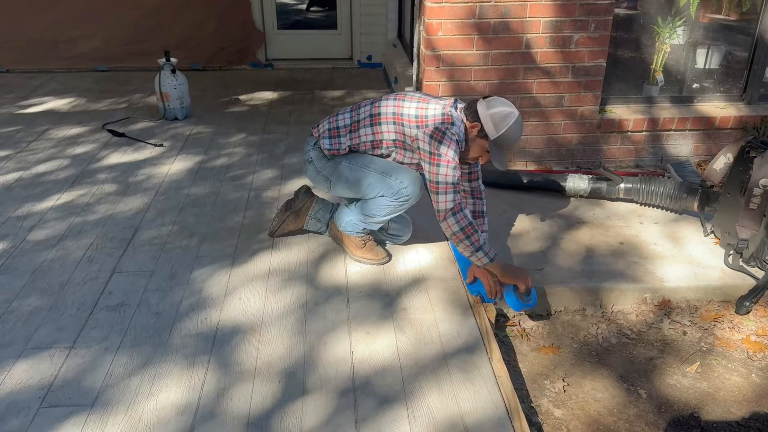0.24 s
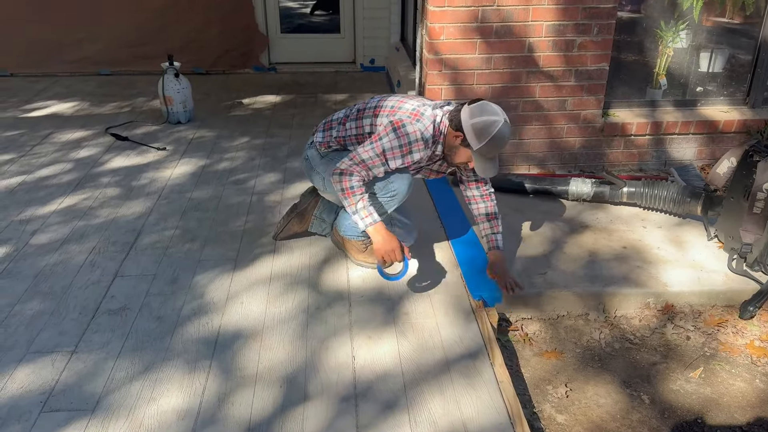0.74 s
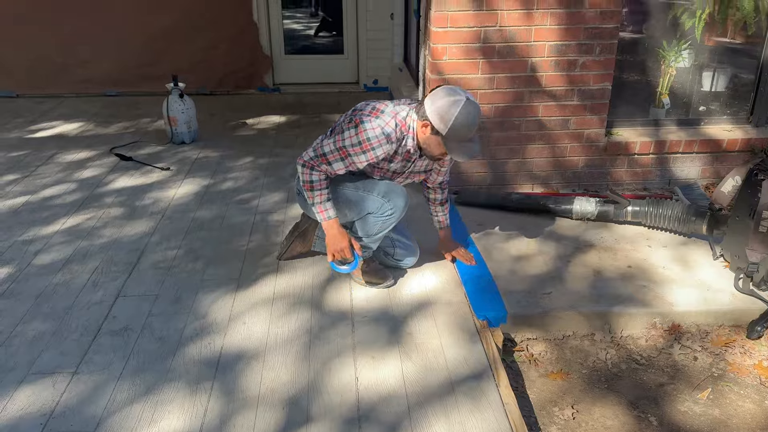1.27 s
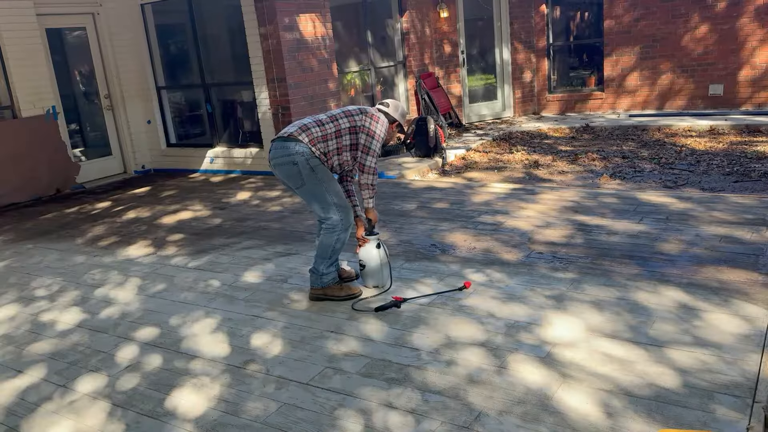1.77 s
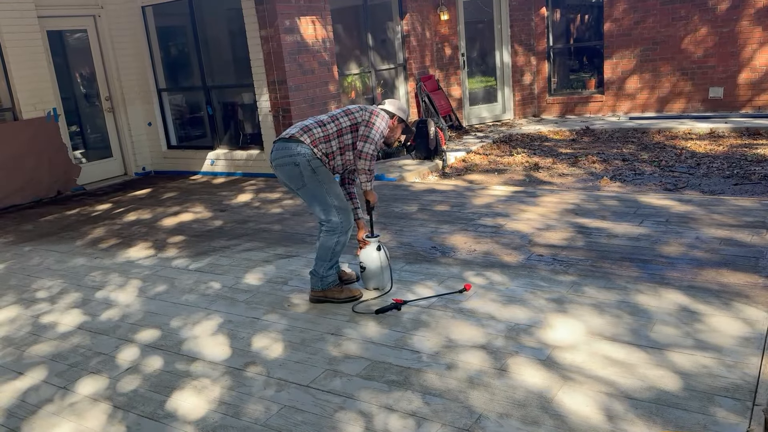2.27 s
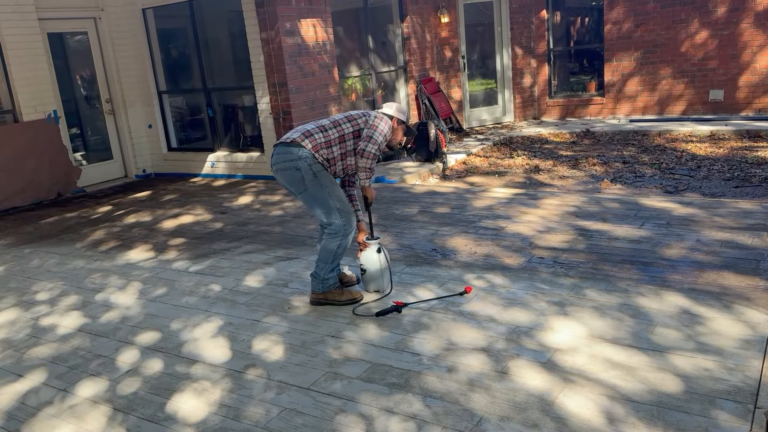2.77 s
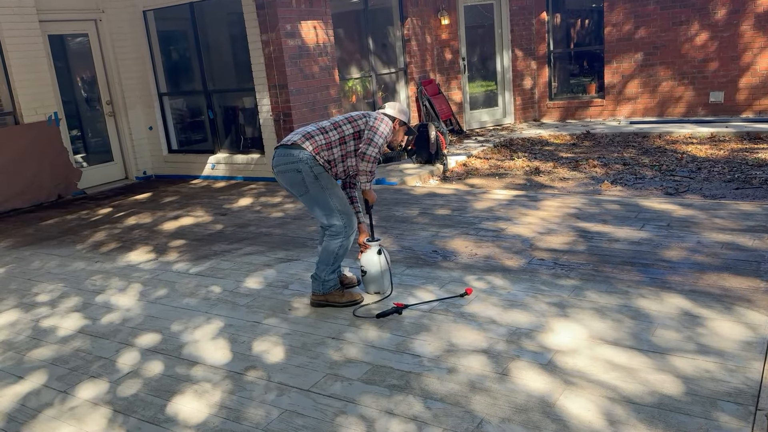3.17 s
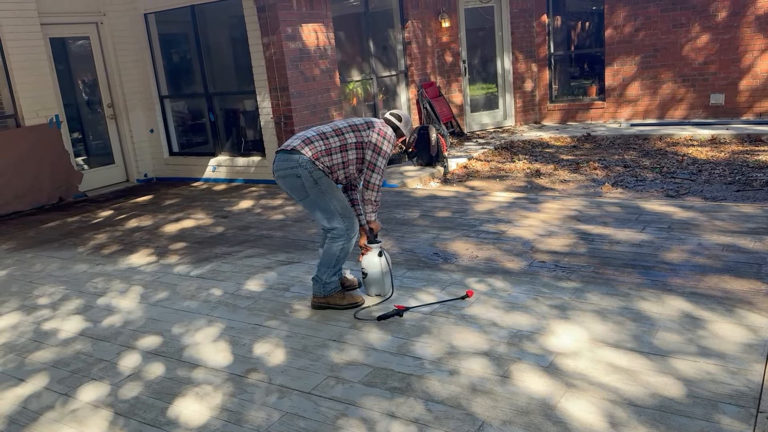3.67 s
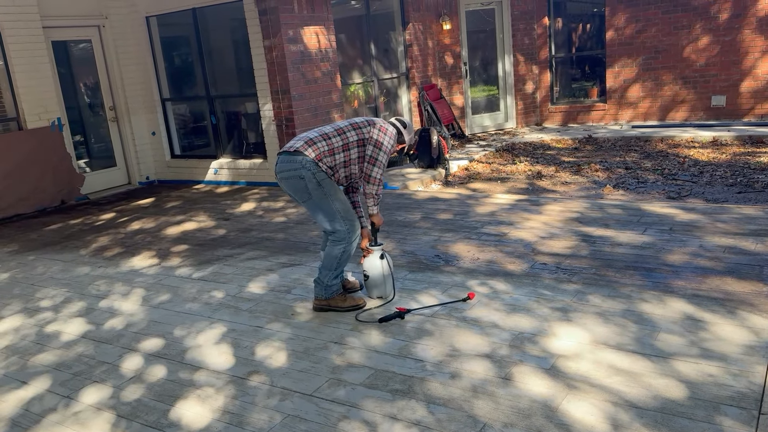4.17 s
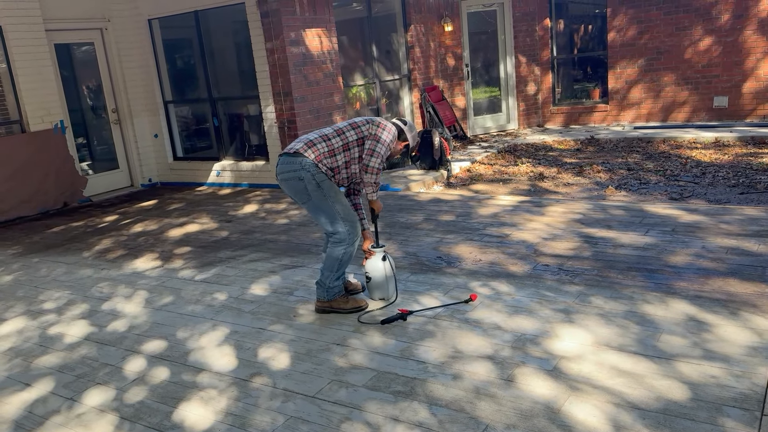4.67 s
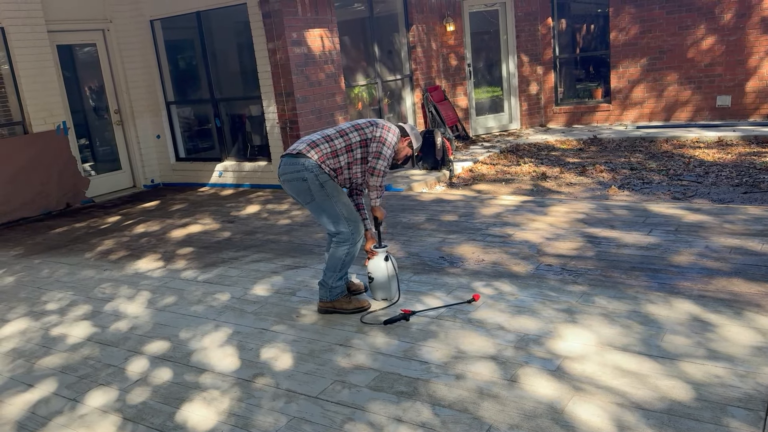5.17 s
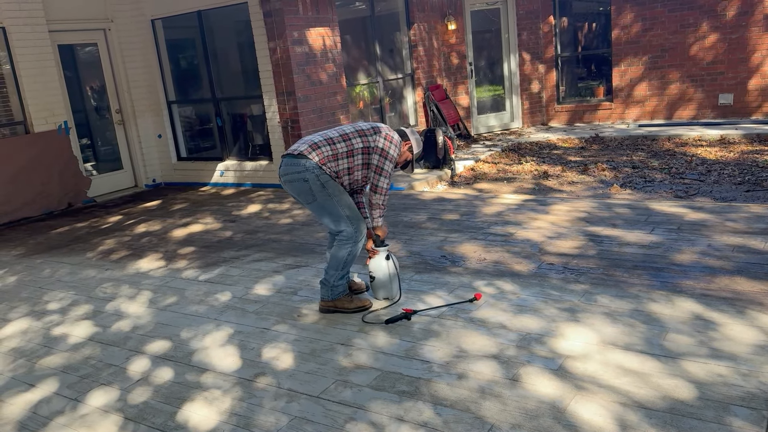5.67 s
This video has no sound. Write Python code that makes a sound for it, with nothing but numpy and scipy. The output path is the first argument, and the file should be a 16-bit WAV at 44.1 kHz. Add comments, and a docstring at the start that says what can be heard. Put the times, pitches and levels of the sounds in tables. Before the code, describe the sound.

Very quiet masking tape peels off its roll in two short crackling strips over faint rumble. A hard cut brings a much louder sprayer pump: about two and a half strokes a second, rubber squeaks and lower groans on pushes, airy hisses and small chirps on pulls, plastic clacks throughout. Close stereo outdoor perspective, short dull wall echoes, distant rumble growing. It ends in a falling squeal and a clack.

```python
"""Outdoors on a patio, in a wide stereo picture: masking tape is peeled quietly off its roll in two strips.
Then, abruptly, a garden sprayer is pumped, 2.5 strokes a second, over slowly growing distant outdoor noise.
On each push the piston seal rubs and squeaks on the plastic tank's resonances, and the handle clacks;
on each pull air hisses into the barrel and, mostly, the seal chirps higher. A house wall repeats squeaks
and clacks a moment later. The last push ends in a falling squeal; one more clack follows."""
import sys
import numpy as np
from scipy import signal
from scipy.fft import rfft, irfft, next_fast_len
from scipy.io import wavfile
from scipy.ndimage import map_coordinates

SR = 44100
rng = np.random.default_rng(int(sys.argv[2]) if len(sys.argv) > 2 else 0)


def log_audio(samples):
    """Write samples as a 16-bit WAV file to the path given in sys.argv[1]."""
    # one column per channel
    frames = np.atleast_2d(samples).T
    # limit to full scale, then quantise
    limited = np.clip(frames, -1, 1)
    pcm = np.round(limited * 32767).astype(np.int16)
    wavfile.write(sys.argv[1], SR, pcm)


N = 261245
TIME = np.arange(N) / SR
PUMP_START = 1.508  # the tape gives way to the sprayer (s)

# Pushes: the seal squeaks as it starts to move, then groans lower as it takes the load
# [squeak t/s, squeak level/dB, groan delay/s, groan level/dB], before the rubber gain
PUSHES = [(1.668, -35.5, .04, -33.5), (2.104, -24, .049, -29), (2.505, -26, 0.049, -25.5),
          (2.897, -26.5, .047, -20), (3.295, -24, 0.04, -22.5), (3.688, -28, .046, -20),
          (4.081, -24.5, .038, -23.5), (4.478, -26.5, 0.049, -18.5), (4.878, -27, .037, -16.5),
          (5.269, -25.5, .032, -20)]
# Last push: the squeak slides down into the groan [t/s, f/Hz, level/dB], before the rubber gain
SQUEAL = [(5.641, 851, -32), (5.653, 754, -17.5), (5.664, 690, -14.5), (5.677, 617, -23.5),
          (5.689, 463, -20), (5.717, 455.3, -19), (5.741, 430, -40)]
# Pulls: air is drawn into the barrel [t/s, hiss level/dB], before each layer's gain
PULLS = [(1.815, -45), (2.236, -42), (2.631, -39), (3.023, -39.5), (3.424, -41.5), (3.824, -40),
         (4.209, -42), (4.607, -38.5), (4.996, -41), (5.377, -42.5)]
# Colour of the seal's rubbing [f/Hz, density/dB per Hz]
RUB = [(60, -23), (150, 12.5), (330, 8.5), (580, 1), (850, -4), (1100, -5), (1550, 1), (2200, 1.5),
       (3000, -26), (4200, -11), (9000, -22)]
# Colour of what the house and patio send back [f/Hz, level/dB]
ECHO_COLOUR = [(150, -11), (330, -8), (450, -7), (800, -8), (1200, -16), (2500, -23), (10000, -32)]


def amp(db):
    """Decibels to amplitude."""
    return 10 ** (np.asarray(db) / 20)


def unit(x):
    """Scale to rms 1."""
    return x / np.sqrt(np.mean(x ** 2) + 1e-20)


def along(points, hz):
    """Read (Hz, value) points on a log frequency axis."""
    f, v = np.transpose(points)
    return np.interp(np.log(hz + 1), np.log(f), v)


def wobble(rate, size=N):
    """A smooth random curve, rate knots a second."""
    knots = rng.standard_normal(size // 8)
    return map_coordinates(knots, [np.arange(size) * rate / SR], mode="wrap")


def add(track, s, sound):
    """Mix a sound into a track from time s."""
    part = track[max(round(s * SR), 0):][:len(sound)]
    part += sound[:len(part)]


def filtered(x, response):
    """Filter x by a complex response of frequency."""
    size = x.shape[-1]
    m = next_fast_len(size + SR // 4)
    return irfft(rfft(x, m) * response(np.fft.rfftfreq(m, 1 / SR)), m)[..., :size]


def rush(spectrum, likeness=None):
    """Stereo noise of rms 1 with a given colour and left-right likeness."""
    if likeness is None:
        # How alike left and right are for the sprayer and yard [f/Hz, left-right correlation]
        likeness = [(60, 0.94), (290, 0.91), (640, 0.29), (2200, 0.67), (5200, 0.34), (7400, 0.36),
                    (9000, 1), (15000, 0.97)]

    def mid_side(hz):
        turn = np.arccos(np.clip(along(likeness, hz), -1, 1)) / 2
        return amp(along(spectrum, hz)) * [np.cos(turn), np.sin(turn)]

    mid, side = filtered(rng.standard_normal((2, N)), mid_side)
    return unit(np.array([mid + side, mid - side]))


def swell(start, rise, hold, fall):
    """A gate that opens, holds and closes along the clock."""
    corners = np.cumsum([0, abs(rise), abs(hold), abs(fall)])
    return np.interp(TIME - start, corners, [0, 1, 1, 0])


def pushes():
    """Start and rubbing level of every push, the squealing one included; rubbing grows with the pressure."""
    lead_s = 0.035  # rubbing starts this long before the squeak
    start_db, grows_db_per_s = -35, 0.85  # before each layer's gain
    squeak_times = [row[0] for row in PUSHES] + [SQUEAL[1][0]]
    return [(s - lead_s, start_db + grows_db_per_s * (s - PUMP_START)) for s in squeak_times]


def each(strokes, delay, rise, hold, fall):
    """The same swell on every stroke, at that stroke's level."""
    return sum(amp(db) * swell(s + delay, rise, hold, fall) for s, db in strokes)


def seal(pitch, bright_db, jitter=0.021, shimmer_db=1.74, rasp=0.25, overtone_db=-2.1):
    """The seal sticks and slips; uneven slips smear the overtones more than the fundamental."""
    # How the tank radiates the overtones [f/Hz, level/dB]
    radiation = [(900, 4), (1500, 14), (2200, 6), (2900, -12.5), (3800, 1.5), (6000, -37), (12000, -38)]
    size, k = len(pitch), np.arange(2, 9)[:, None]  # k: harmonic number
    phase = 2 * np.pi * np.cumsum(pitch * (1 + jitter * wobble(356.5, size))) / SR
    slips = phase + rasp * wobble(600.5, size)
    weight = amp(along(radiation, k * pitch)) / np.sqrt(k)
    upper = np.sum(weight * np.cos(k * slips), axis=0) / np.linalg.norm(weight, axis=0)
    tone = np.cos(phase) + amp(bright_db + overtone_db) * upper
    return -np.sqrt(2) * amp(shimmer_db * wobble(297.4, size)) * tone


def slip(s, db, length, hz, glide, bright_db):
    """One short gliding burst of the seal, centred on time s; length is its width at half amplitude."""
    pitch_scatter, glide_scatter = 0.0252, 2.5  # from slip to slip: octaves, octaves per s
    out, t = np.zeros(N), np.arange(-SR // 16, SR // 16) / SR
    bend, detune = rng.standard_normal(2)
    pitch = hz * 2 ** (pitch_scatter * detune + (glide + glide_scatter * bend) * t)
    envelope = 2 ** -(2 * t / length) ** 2
    add(out, s + t[0], amp(db) * envelope * seal(pitch, bright_db))
    return out


def squeaks():
    """Stick-slip bursts: a squeak and a groan on each push, a rising chirp on most pulls."""
    # Upward chirps of the seal on pulls [t/s, level/dB, length/s, f/Hz], before the rubber gain
    chirps = [(2.253, -28.5, 0.011, 1140), (2.641, -31, .014, 1049), (2.673, -26.5, 0.0056, 1205),
              (3.036, -29.5, 0.012, 1078), (3.439, -34, 0.008, 1125), (3.838, -29, 0.0096, 1110),
              (4.62, -24.5, .006, 1067), (5.012, -28, .007, 1102), (5.391, -27.5, 0.013, 1165)]
    squeak_hz, sag_hz_per_s = 825, 17  # the squeak drops as the tank fills
    out = np.zeros(N)
    for s, db, after, groan_db in PUSHES:
        hz = squeak_hz - sag_hz_per_s * (s - PUMP_START)
        # glides in octaves per s, lengths in s
        out += slip(s, db, length=0.015, hz=hz, glide=-5, bright_db=-7)
        out += slip(s + after, groan_db, length=0.019, hz=451.5, glide=-1.993, bright_db=-6.5)
    for s, db, length, hz in chirps:
        out += slip(s, db, length, hz, glide=5, bright_db=-18)
    return out


def squeal():
    """Against full pressure the seal sticks and slips on in one falling tone."""
    s, hz, db = np.transpose(SQUEAL)
    out, t = np.zeros(N), np.arange(s[0], s[-1], 1 / SR)
    add(out, s[0], amp(np.interp(t, s, db)) * seal(np.interp(t, s, hz), bright_db=-5))
    return out


def whistle(start_hz, rise, jitter, level_db):
    """As the rod comes up, the seal whistles faintly and unsteadily, rising in pitch (octaves per s)."""
    out = np.zeros(N)
    for up, hiss_db in PULLS:
        pitch = start_hz * 2 ** (rise * np.clip(TIME - up, 0, .2)) * (1 + jitter * wobble(320))
        gate = swell(up - .01, 0.015, 0.045, 0.035)
        out += amp(hiss_db + level_db) * gate * np.sin(2 * np.pi * np.cumsum(pitch) / SR)
    return out * amp(2.4 * wobble(57))


def creaks(level_db, low_hz, span, life, count=5):
    """Through the rest of each pull the seal catches at random in tiny creaks that tend to rise."""
    out, t = np.zeros(N), np.arange(SR // 20) / SR
    for up, hiss_db in PULLS:
        for late, size, detune in rng.random((count, 3)):
            phase = 2 * np.pi * low_hz * 2 ** (0.35 * late + 0.28 * detune) * t
            ring = np.sin(phase) + 1.6 * np.sin(0.312 * phase) + 0.57 * np.sin(3 * phase)
            envelope = t / life * np.exp(1 - t / life)  # peaks after life seconds
            add(out, up + .03 + span * late, amp(hiss_db + level_db + 5.2 * size) * envelope * ring)
    return out


def clacks(thud_hz, thud_t60, thud_delay, thud_sweep, crack_t60, colour_width):
    """A crack, the short ring of stiff plastic, and a moment later the tank's soft falling thud."""
    # The handle against its stops [t/s, level/dB, thud relative level/dB]
    blows = [(1.664, -22, 8.5), (1.7197, 1, 2), (1.9742, -13, -6), (2.2033, -18, 7), (2.4806, -20, -1),
             (2.6147, -18.5, 11), (2.851, -22, 4), (2.9957, -16, 9.5), (3.1048, -21, 9), (3.4099, -19, 10),
             (3.7965, -14, 9), (4.1805, -23.5, 16.5), (4.3419, -18, 2), (4.8167, -20.5, -9),
             (4.967, -21, 8), (5.0091, -25, -10), (5.3503, -15, 6.5), (5.5132, -16, 0), (5.7272, -14, 12.5)]
    # Ringing modes of the pump's plastic, before scatter [f/Hz, relative level/dB, t60/s]
    plastic = [(640, -6.5, 0.038), (948, 11, 0.012), (1143, 6.5, 0.021), (1504, 7.5, 0.027),
               (1920, 6.5, 0.02), (2296, 9, 0.015), (2850, 1, 0.022), (3597, 5.5, 0.013),
               (6610, -13, 0.033)]
    contact_hz, crack_db = 1650, -16  # where a blow rings the plastic most; its crack
    out, t = np.zeros(N), np.arange(SR // 8) / SR
    hz, mode_db, t60 = np.transpose(plastic)[:, :, None]
    contact = 1 / (1 + (np.log2(hz / contact_hz) / colour_width) ** 2)  # width in octaves
    buildup = 1 - np.exp(-(t * hz / 1.35) ** 2)  # low bending waves travel slowly and build up late
    late = np.maximum(t - thud_delay, 0)
    thud_pitch = thud_hz * (1 + thud_sweep * np.exp(-late / 0.0024))
    thud_tone = np.sin(2 * np.pi * np.cumsum(thud_pitch * (late > 0)) / SR)
    for s, db, thud_db in blows:
        strength, detune, angle = rng.standard_normal((3, len(plastic), 1))
        modes = contact * amp(mode_db + 2.3 * strength - 60 * t / t60) * buildup
        ring = np.sum(modes * np.sin(2 * np.pi * (hz * (1 + .025 * detune) * t + angle)), axis=0)
        crack = amp(crack_db - 60 * t / crack_t60) * rng.standard_normal(len(t))
        thud = amp(thud_db - 14.5 - 60 * late / thud_t60) * thud_tone
        add(out, s, amp(db) * (ring / np.abs(ring).max() + crack + thud))
    return out


def tank(x):
    """The hollow tank rings on after whatever shakes it: parallel resonances."""
    # Air and wall of the tank [f/Hz, width/Hz, level/dB]
    resonances = [(406, 13, -16.5), (794, 85, 7), (1050, 270, -18)]
    return filtered(x, lambda f: sum(amp(db) * 1j * f * w / (c * c - f * f + 1j * f * w)
                                     for c, w, db in resonances))


def piston(grain_db, slide_db, hiss_gain_db):
    """Grainy rubbing on the push; on the pull, lighter sliding and the hiss of air drawn in."""
    # Colour of the seal sliding back [f/Hz, density/dB per Hz]
    slide = [(60, -51), (200, -2), (340, 17.5), (600, -2), (1200, -5), (1800, -2.5), (3000, -27),
             (4000, -35), (6000, -33)]
    # Colour of the air rushing in [f/Hz, density/dB per Hz]
    intake = [(1000, -43), (4000, -3.5), (7500, -16.5), (9200, -3), (11000, 3), (13000, -2.5), (15500, 2)]
    push = amp(-3.5) * each(pushes(), delay=0, rise=0.028, hold=0.079, fall=.12)
    pull = amp(slide_db) * each(PULLS, delay=-0.013, rise=.0067, hold=0.025, fall=0.12)
    suck = each(PULLS, delay=-0.0024, rise=0.0057, hold=0.11, fall=0.12)

    def grain():
        return unit(amp(grain_db * wobble(220) + 6.8 * wobble(40)))

    hiss = amp(hiss_gain_db + 1.7 * wobble(60)) * rush(intake)
    return push * grain() * rush(RUB) + pull * grain() * rush(slide) + suck * hiss


def rod(scratch_db, valve_db, spiky_db, drone_db):
    """The rod scratches as a push begins, then its drag stirs the tank; the valve rattles as a pull begins."""
    # The rod in its guide [f/Hz, density/dB per Hz]
    guide = [(700, -35), (1500, -1), (2200, 3), (3000, -16.5)]
    # The valve's fine rattle [f/Hz, density/dB per Hz]
    valve_colour = [(2600, -37), (3600, -1.5), (3900, -1), (4300, 0), (5200, -21)]
    lead = each(pushes(), delay=-0.026, rise=0.022, hold=0.039, fall=0.065)
    drag = each(pushes(), delay=0.012, rise=0.016, hold=0.036, fall=0.13)
    rattle = each(PULLS, delay=-0.00038, rise=0.012, hold=0.014, fall=0.026)

    def spikes():
        return unit(amp(spiky_db * np.minimum(wobble(130), 2)))

    scratch = amp(scratch_db) * lead * spikes() * rush(guide)
    valve = amp(valve_db) * rattle * spikes() * rush(valve_colour)
    drone = amp(drone_db) * drag * unit(tank(rush(RUB)))
    return scratch + valve + drone


def peeling():
    """Gain of the peel: each strip starts with a snatch, peels on and dies away; one sags, one swells midway."""
    # Strips pulled off the roll [t/s, length/s, level/dB, first snatch/dB, later swell or sag/dB]
    strips = [(-.005, 0.23, -52.5, 17.5, -2.5), (0.81, 0.48, -50.5, 11, 6.5)]
    snatch_s, release_s = 0.037, .11  # the glue's first grip fades; the hand slows
    bend_after_s, bend_s = .2, 0.066  # centre and width of the later swell or sag
    gain = np.full(N, amp(-65))  # faint rustle between strips
    for s, length, db, snatch_db, bend_db in strips:
        t = np.maximum(TIME - s, 0)
        snatch = snatch_db * np.exp(-t / snatch_s)
        bend = bend_db * np.exp(-((t - bend_after_s) / bend_s) ** 2)
        gain = np.hypot(gain, amp(db + snatch + bend) * swell(s, .004, length, release_s))
    return gain


def tape(crackle_db):
    """Glue lets go in fine crackles, with a few bumps and snaps, over a soft uneven rumble."""
    # Bumps, scuffs and snaps of handling [t/s, level/dB before a 9 dB cut, f/Hz, t60/s]
    handling = [(0.089, -26, 109, 0.12), (0.147, -32, 84.5, 0.32), (.405, -42, 645, 0.17),
                (0.58, -30, 2000, 0.022), (1.224, -30.5, 9000, 0.025)]
    # Colour of the peeling glue [f/Hz, density/dB per Hz]
    glue = [(300, -6), (1000, -3.5), (2200, 0), (3500, -3), (6000, -1.5), (8500, 4), (12500, -5),
            (15000, -0.5)]
    # Colour of the background rumble [f/Hz, density/dB per Hz]
    low_noise = [(25, -13), (60, -3.5), (170, -8.5), (350, -12), (1200, -20), (2600, -30.5)]
    # How alike left and right are for the tape [f/Hz, left-right correlation]
    alike_tape = [(100, 0.92), (700, 0.28), (3100, 0.73), (8000, 0)]
    snaps, t = np.zeros(N), np.arange(SR // 4) / SR
    for s, db, hz, t60 in handling:
        noise = filtered(rng.standard_normal(len(t)), lambda f: 1 / (1 + (np.log((f + 1) / hz) / 0.49) ** 4))
        add(snaps, s, amp(db - 9.0 - 60 * t / t60) * (1 - np.exp(-t * hz)) * unit(noise))
    crackle = unit(amp(crackle_db * wobble(900) + 2.2 * wobble(44.1)))
    peel = peeling() * crackle * rush(glue, alike_tape)
    rumble = amp(-56 + 1.9 * wobble(24.96)) * rush(low_noise, alike_tape)
    return snaps + peel + rumble


def walls(x):
    """The house throws back delayed dull echoes, each leaning to one side."""
    # House walls [delay/s, level/dB, left over right/dB]
    echoes = [(.0435, 0, 1), (.031, -15, -3), (.107, -12, 1)]
    sides = np.array([[.5], [-.5]])

    def paths(hz):
        return sum(amp(db + pan_db * sides) * np.exp(-2j * np.pi * hz * delay) for delay, db, pan_db in echoes)

    return filtered(x, lambda hz: amp(along(ECHO_COLOUR, hz)) * paths(hz))


def patio(x):
    """Paving, windows and furniture scatter a short answer that differs between the ears above the bass."""
    # Decay of the scattered sound [f/Hz, t60/s]
    decay = [(150, 0.33), (1000, 0.23), (4000, 0.15), (12000, 0.27)]
    hz, t, z = signal.stft(rng.standard_normal((2, SR // 2)), SR, nperseg=256)
    colour = amp(along(ECHO_COLOUR, hz) / 2)[:, None]  # half as dull, in dB, as the wall echoes
    envelope = amp(-60 * t / along(decay, hz)[:, None]) * (1 - np.exp(-t / 0.098))
    tail = signal.istft(z * colour * envelope, SR, nperseg=256)[1]
    mid, side = signal.fftconvolve(x[None], tail / np.linalg.norm(tail[0]), axes=1)[:, :N]
    side = filtered(side, lambda f: 1 - np.exp(-(f / 480) ** 4))
    return np.array([mid + side, mid - side])


def yard():
    """Distant outdoor rumble, slowly growing, under a steady high hiss."""
    # Distant outdoor noise [f/Hz, density/dB per Hz]
    distance = [(18, -33), (30, -2.5), (85, 2.5), (149, -4), (353, -10), (576, -14), (1030, -13),
                (1760, -19.5), (3300, -23.5), (3700, -24), (7800, -20.5), (10100, -133), (17200, -120)]
    # High hiss [f/Hz, density/dB per Hz]
    air = [(4000, -4), (7000, -75), (9400, 5.5), (11000, 1.5), (13000, 2), (15500, 2.5)]
    level_db = -35 + 0.87 * (TIME - PUMP_START)  # grows 0.87 dB per s
    rumble = filtered(rush(distance), lambda hz: 1 - np.exp(-(hz / 42) ** 4))  # the microphone sheds the deepest bass
    return amp(level_db + 1.3 * wobble(12)) * rumble + amp(-42.5) * rush(air)


def stereo_phase(x):
    """Treble differs in phase between left and right, by an amount that changes with frequency."""
    # Phase between left and right [f/Hz, left lag/rad]
    lag = [(100, 0), (7600, 0.78), (8300, -2), (9100, 3), (11300, 7.5), (13450, 8.5), (15600, 14)]
    return filtered(x, lambda hz: np.exp(.5j * along(lag, hz) * np.array([[-1], [1]])))


def scene():
    """First the tape, then the sprayer with its echoes and the yard behind it."""
    rubber = amp(2.37) * (squeaks() + squeal())
    rubber += whistle(start_hz=1040, rise=4.9, jitter=0.0382, level_db=0)
    rubber += creaks(level_db=-0.2, low_hz=1064, span=.12, life=0.0021)
    knocks = clacks(thud_hz=188.5, thud_t60=0.063, thud_delay=0.00305, thud_sweep=1.9,
                    crack_t60=0.015, colour_width=2.5)
    pump = rubber + knocks
    body = pump + amp(-13) * tank(np.roll(pump, SR // 50))  # the ring builds up 20 ms behind each slip
    body = body * amp(0.8 * np.array([[.5], [-.5]]))  # 0.8 dB louder on the left
    friction = piston(grain_db=4.5, slide_db=4.5, hiss_gain_db=6)
    friction += rod(scratch_db=-5.5, valve_db=-1.0, spiky_db=7.5, drone_db=-4.0)
    scatter = patio(amp(-19.5) * rubber + amp(-16.5) * knocks)
    sprayer = stereo_phase(body + walls(pump) + scatter + friction + yard())
    return np.where(TIME < PUMP_START, tape(crackle_db=1.5), sprayer)


def record(dry):
    """Peaks are capped at full scale, then nothing is kept above the band limit."""
    top_hz = 15800
    return filtered(np.clip(dry, -1, 1), lambda hz: hz < top_hz)


dry = scene()
out = record(dry)
log_audio(out)
```